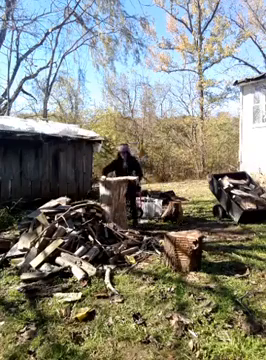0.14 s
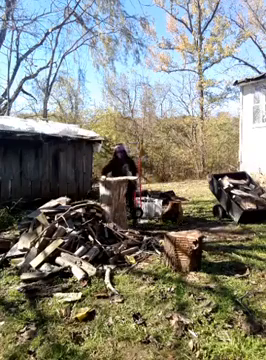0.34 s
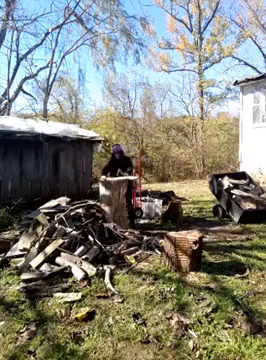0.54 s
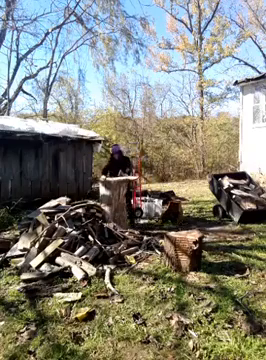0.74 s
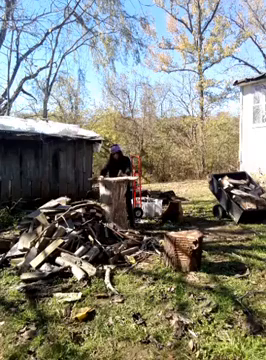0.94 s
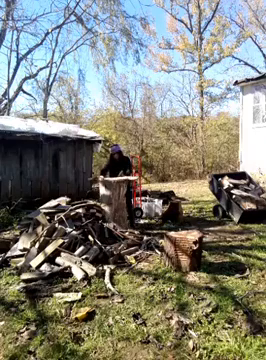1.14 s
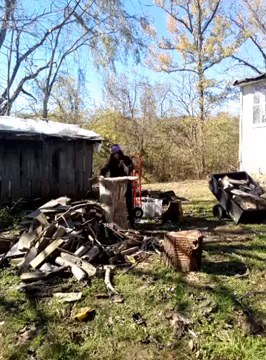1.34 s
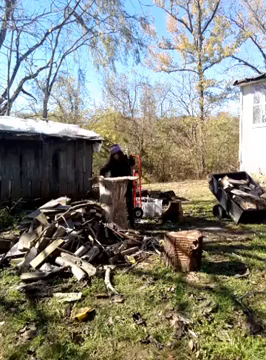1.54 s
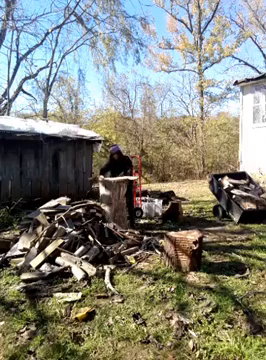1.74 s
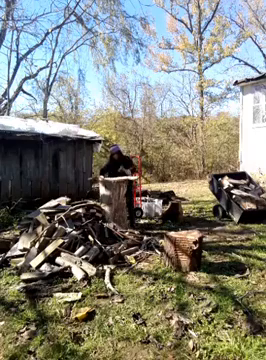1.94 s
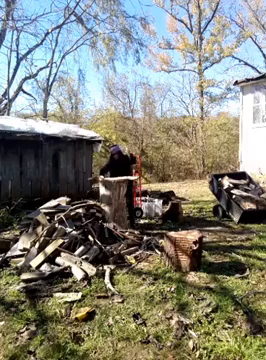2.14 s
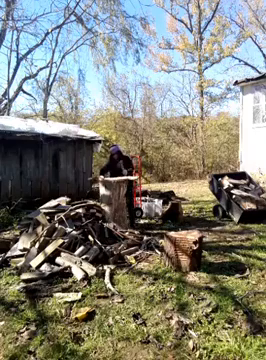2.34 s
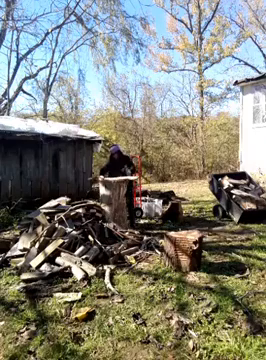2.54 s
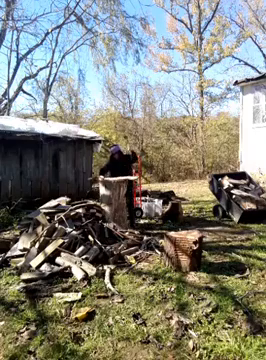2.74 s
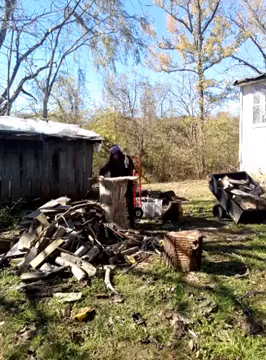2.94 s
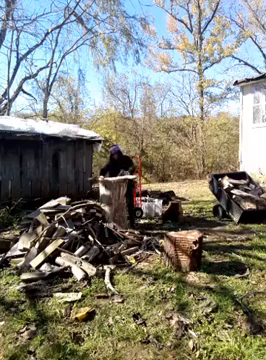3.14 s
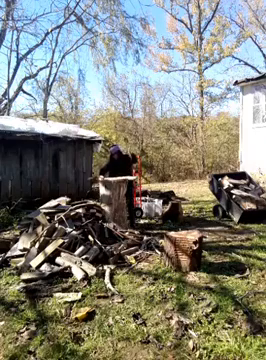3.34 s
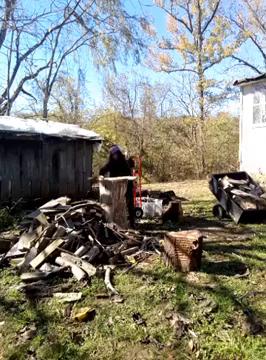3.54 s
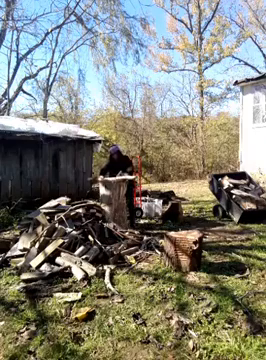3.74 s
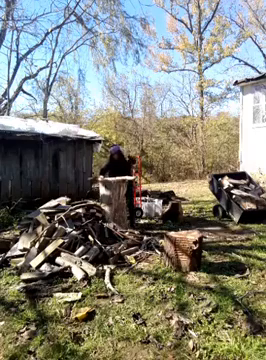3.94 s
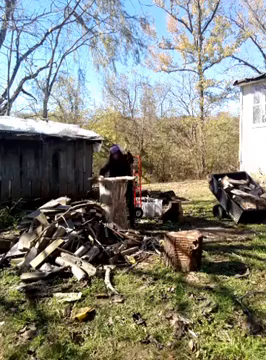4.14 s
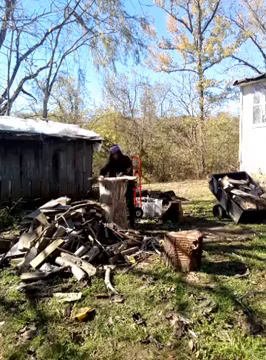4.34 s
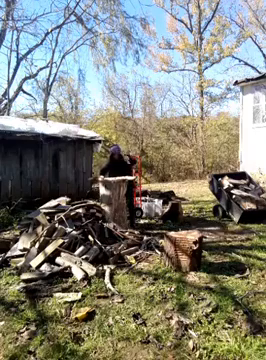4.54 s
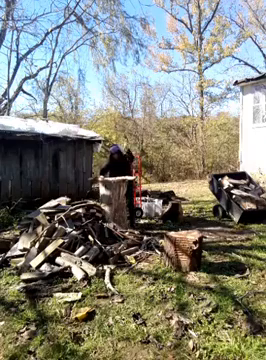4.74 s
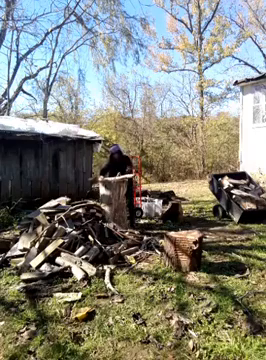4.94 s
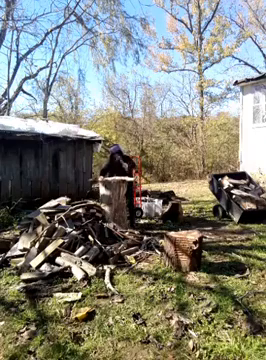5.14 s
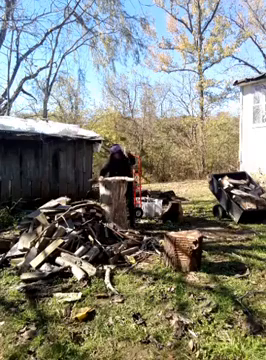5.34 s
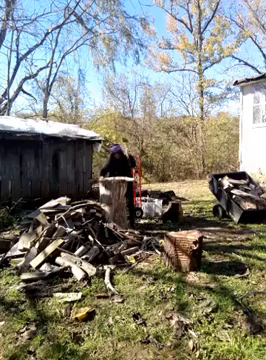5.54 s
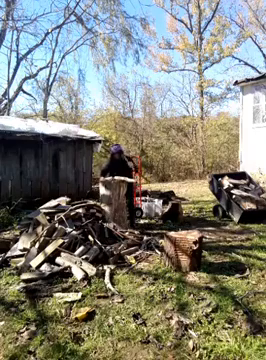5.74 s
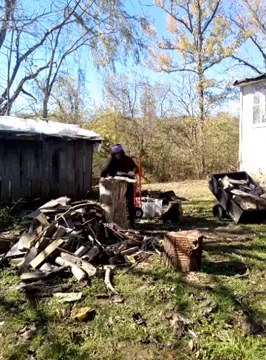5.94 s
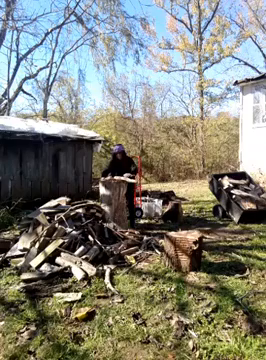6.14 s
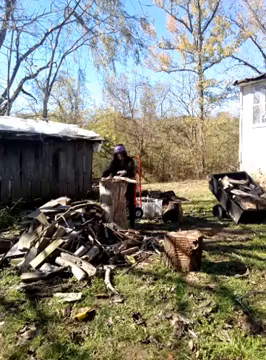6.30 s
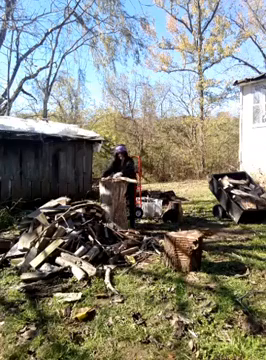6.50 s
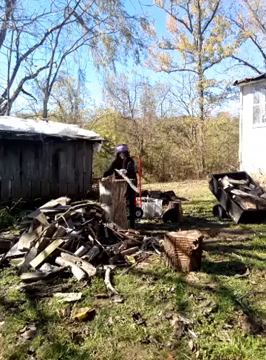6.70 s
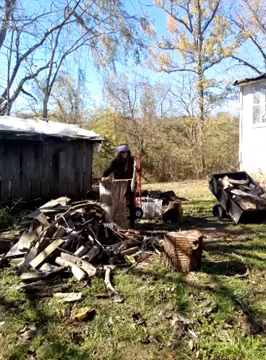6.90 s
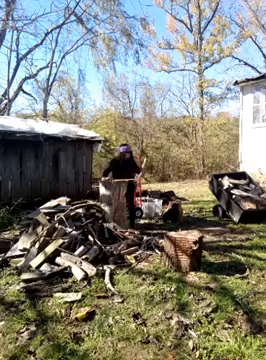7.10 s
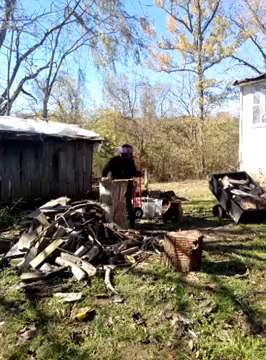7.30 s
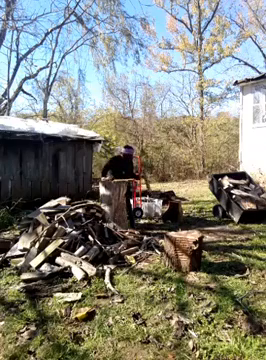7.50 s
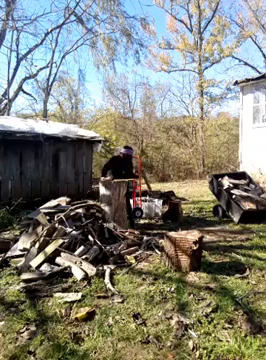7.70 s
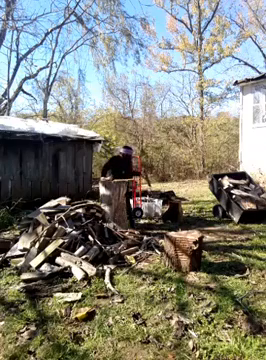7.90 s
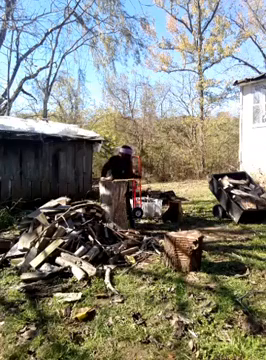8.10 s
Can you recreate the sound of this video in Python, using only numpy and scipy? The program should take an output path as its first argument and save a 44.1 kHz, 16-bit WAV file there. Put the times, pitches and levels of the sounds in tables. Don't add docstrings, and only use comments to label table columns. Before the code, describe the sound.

Six sharp hatchet chops on a wooden block in an open yard, evenly spaced, then a cut stick drops and bounces over faint wind.

```python
import sys
import numpy as np
from scipy import signal
from scipy.fft import rfft, irfft
from scipy.io import wavfile
from scipy.ndimage import uniform_filter1d

SR = 44100
rng = np.random.default_rng(int(sys.argv[2]) if len(sys.argv) > 2 else 0)


def volts_from_decibels(level):
    exponent = np.asarray(level, float) / 20
    return 10 ** exponent


def log_audio(samples):
    frames = np.atleast_2d(samples).T
    limited = np.clip(frames, -1, 1)
    pcm = np.round(limited * 32767).astype(np.int16)
    wavfile.write(sys.argv[1], SR, pcm)


N = 364266

# pitch_hz, level_db (per Hz)
AIR_COLOUR = [(25, 0.5), (60, 8.5), (95, 12), (200, 4), (500, -2.5), (1200, -13.5), (3000, -16.5),
              (5000, -16), (9000, -26.5)]
# delay_s, level_db, spread_s
WALL_ECHOES = [
    (0.011, -22.5, .003),
    (.019, -12.5, .005),
    (.026, -14, .008),
    (0.043, -21, 0.016),
    (.118, -39, 0.015),
]
# pitch_hz, near_db (leaves and walls), far_db (trees)
SCATTER = [(74, -26, -47), (200, -23, -41), (430, -34, -48), (750, -30.5, -44), (1250, -27, -45),
           (2500, -26, -42), (6500, -23.5, -36.5), (11800, -29, -46)]
# start_s, level_db (peak), fade_s (for 20 dB), dull_db
BRUSHES = [(0.005, -68, .07, 0), (0.094, -70, .015, -18), (0.2, -67, .22, 14), (0.66, -82, .16, 24),
           (0.742, -61, .045, 21), (1.16, -78, .07, 0), (1.83, -82, .05, -5), (4.982, -72, .012, -10),
           (5.288, -64, .025, -10), (5.398, -70, .015, -10), (5.45, -72, .012, -10), (6.41, -60, .12, 5),
           (6.73, -72, .07, 5), (6.83, -72, .08, 10), (7.59, -73, .12, 8)]
# start_s, level_db, hardness_db (per mode group upward), lowest_mode_db
STICK_KNOCKS = [
    (0.19, -84, 11, 2),
    (0.7362, -68, 4, 4),
    (2.4179, -76, 3, 18),
    (6.3244, -46.5, -6, 5),
    (6.4053, -51, 1, -9),
    (6.5224, -61, -2, 7),
    (6.6084, -80, 1, 21),
    (6.7311, -75, -3, -3),
    (7.7544, -82, 2, 1),
    (8.0794, -80, 3, -4),
]
# pitch_hz, t60_s
STICK_MODE_GROUPS = [
    [(2260, .04)],
    [(2900, .03)],
    [(3350, 0.026), (3950, .015)],
    [(4900, 0.027), (5750, 0.0081)],
    [(1030, 0.036)],
]
STICK_EVEN_DB = [0, 2, -1, -8]
# start_s, level_db (peak), deep_db, block_knock_db
BLOW_THUDS = [
    (1.925, -35, -20, 16),
    (2.572, -38, -20, 17),
    (3.209, -33, -14, 8),
    (3.833, -38, -4, 1),
    (4.465, -32, -28, 5),
    (5.094, -45, -17, 19),
]
# start_s, level_db (peak), deep_db, block_knock_db
DROP_THUDS = [
    (0.219, -59, -13, -10),
    (0.659, -54, -40, 0),
    (0.742, -48, -10, -6),
    (5.26, -63, -4.5, -8),
    (6.323, -52, -35, 0),
    (6.403, -49.5, -26, 6),
    (6.523, -53, -33, 4),
    (6.608, -59, -12, -5),
]
# start_s, lower_mode_db, upper_mode_db, sizzle_db, extra_sizzle_to_walls_db
STEEL_HITS = [
    (0.0189, -66, -70, -76, 29),
    (0.093, -76, -64, -85, 21),
    (0.1196, -72, -77, -81, 15),
    (1.9252, -31.5, -38.5, -37, 21),
    (2.5755, -31, -31.5, -36.5, 19),
    (3.2113, -38, -40.5, -38.5, 21),
    (3.558, -82.5, -66.5, -69, 17),
    (3.8345, -63, -46.5, -42, 18),
    (4.4647, -42.5, -32, -33, 23.5),
    (5.0936, -70, -52.5, -42, 20),
]
# pitch_hz, t60_s
STEEL_RINGS = [(6700, .03), (9800, .03)]
# start_s, level_db (peak), ring_hz, overtone_db, crack_db
LIGHT_TAPS = [(0.629, -60, 740, -24, -31), (0.657, -36.5, 256, -38, -40), (0.738, -39, 653, -19, -22),
              (2.416, -49, 745, -9, -11), (6.326, -28, 890, -28, -30), (6.405, -32.5, 695, -7.5, -8),
              (6.523, -40, 673, -5, -9.5), (6.609, -48, 703, -20, -15), (6.729, -68, 762, -11, -10),
              (6.839, -59, 736, -14, -28), (7.754, -66, 773, -16, -5), (8.079, -66, 792, -13.5, -4),
              (3.1795, -57, 800, -6, -14), (3.058, -66, 760, 0, -10)]
# start_s, level_db (peak), ring_hz, overtone_db, crack_db
BLOWS = [
    (1.9248, -14, 600, -19.5, -8),
    (2.5735, -9, 625, -8.5, -7.5),
    (3.21, -9.5, 777, -14.5, -12),
    (3.8345, -15, 746, -18, -9.5),
    (4.464, -12, 780, -14.5, -1),
    (5.096, -12.5, 773, -13.5, -12),
]
# pitch_hz, width_hz, level_db
HOLDER_RINGS = [(762, 130, 13), (1393, 90, 6), (2095, 80, 0), (2875, 120, -2), (3225, 170, 4.5),
                (4020, 290, -1.5)]
# pitch_hz, level_db
MIC_COLOUR = [(30, -9), (90, -0.5), (300, 0.5), (2000, 7.5), (5000, 3), (8000, 3.5), (8900, -1),
              (10000, 2.5), (14000, 5)]

LEAD_S = 0.0012
TOP_HZ = 14250


def colour(x, points):
    hz, db = np.transpose(points)
    grid = np.log(np.maximum(np.fft.rfftfreq(4096, 1 / SR), 1))
    cepstrum = irfft(np.log(volts_from_decibels(np.interp(grid, np.log(hz), db))))
    cepstrum[1:2048] *= 2
    cepstrum[2049:] = 0
    return signal.fftconvolve(x, irfft(np.exp(rfft(cepstrum))))[:len(x)]


def ring(x, hz, t60):
    pole = np.exp(2j * np.pi * hz / SR - np.log(1000) / (t60 * SR))
    return signal.lfilter([1], [1, -pole], x).imag


def band(x, lo_hz, hi_hz):
    return signal.sosfilt(signal.butter(2, [lo_hz, hi_hz], "bandpass", fs=SR, output="sos"), x)


def peak(x, db):
    return x * volts_from_decibels(db) / np.max(np.abs(x))


def level(x, db):
    return x * volts_from_decibels(db) / np.sqrt(np.mean(x ** 2))


def walk(rate):
    hold = int(SR / rate)
    steps = np.repeat(rng.standard_normal(N // hold + 1), hold)
    return uniform_filter1d(uniform_filter1d(steps, hold), hold)[:N]


def add(out, x, s):
    i = int(s * SR)
    out[i:i + len(x)] += x[:len(out) - i]


def force(bite_s, chance, steep, let_go_s, scatter_db):
    t = np.arange(len(chance[0])) / SR
    shape = np.where(t < bite_s, (t / bite_s) ** steep, np.exp(-(t - bite_s) / let_go_s))
    return shape * chance[0] * volts_from_decibels(scatter_db * np.abs(chance[1]))


def gain():
    t = np.arange(N) / SR
    sink_db, sink_s = 1.15, .55
    hold_s, recover_s, kept = .9, .35, .25
    sunk_db = sum(sink_db * np.clip((t - row[0]) / sink_s, 0, 1) for row in BLOWS)
    wait = np.maximum(t - BLOWS[-1][0] - hold_s, 0)
    return volts_from_decibels(-sunk_db * (kept + (1 - kept) * np.exp(-wait / recover_s)))


def air():
    noise = colour(rng.standard_normal(N), AIR_COLOUR)
    bass = band(noise, 17, 340)
    return level(volts_from_decibels(1.2 * walk(1.5)) * (noise - bass) + volts_from_decibels(1.5 * walk(3)) * bass, -71.5)


def yard():
    t = np.arange(int(1.2 * SR)) / SR
    out = np.zeros(len(t))
    for delay_s, db, spread_s in WALL_ECHOES:
        smear = (t > delay_s) * np.exp(-np.abs(t - delay_s) / spread_s)
        echo = smear * rng.standard_normal(len(t)) * rng.exponential(size=len(t))
        out += volts_from_decibels(db) * echo / np.sqrt(np.sum(echo ** 2))
    swell = 1 - np.exp(-(t / .018) ** 3)
    tail = 0
    near_t60, open_t60 = .2, 1.5
    points_hz, *levels_db = np.transpose(SCATTER)
    for hz in np.geomspace(74, 11800, 10):
        near_db, far_db = (np.interp(np.log(hz), np.log(points_hz), db) for db in levels_db)
        far_t60 = open_t60 / (1 + 250 / hz + hz / 4500)
        near = volts_from_decibels(near_db - 60 * np.maximum(t - .032, 0) / near_t60)
        far = volts_from_decibels(far_db - 60 * t / far_t60)
        noise = band(rng.standard_normal(len(t)), hz / 1.33, hz * 1.33) / np.sqrt(hz / 40)
        tail = tail + (near + far) * noise
    lumps = volts_from_decibels(2.5 * walk(160)[:len(t)] - 1)
    return out + swell * tail * lumps


def rustle():
    t = np.arange(N) / SR
    lumps_db = 4.4 * np.repeat(rng.exponential(size=N // 64 + 1), 64)[:N] * .5
    grains = rng.standard_normal(N) * volts_from_decibels(lumps_db)
    bright = level(band(grains, 2000, 10200), -6.4)
    dull = level(band(rng.standard_normal(N), 100, 630), -13.5)
    out = np.zeros(N)
    for s, db, fade_s, dull_db in BRUSHES:
        away = np.where(t > s, t - s, (s - t) / .12) / fade_s
        out += volts_from_decibels(db - 20 * away) * (bright + volts_from_decibels(dull_db) * dull)
    return out


def stick():
    out = np.zeros(N)
    chances = rng.standard_normal((len(STICK_KNOCKS), 2, 4096))
    for (s, db, hard_db, low_db), chance in zip(STICK_KNOCKS, chances):
        snaps = force(0.0023, chance, 3.0, 0.00077, 4.0)
        upper_db = np.array(STICK_EVEN_DB) + hard_db * np.arange(len(STICK_EVEN_DB))
        for group, group_db in zip(STICK_MODE_GROUPS, [*upper_db, low_db]):
            tones = sum(ring(snaps, hz, t60) for hz, t60 in group)
            add(out, peak(band(tones, 940, 7600), db + group_db - 5), s - LEAD_S)
    return np.array([out, volts_from_decibels(3.5) * out])


def thuds(rows, direct_db):
    out = np.zeros((2, N))
    push = np.append(np.hanning(40), np.zeros(8000))
    for (s, db, deep_db, block_db), chance in zip(rows, rng.standard_normal((len(rows), 3))):
        thump = sum(ring(push, hz * (1 + 0.058 * k), 0.028) for hz, k in zip((160, 230, 340), chance))
        deep = peak(ring(push, 85, 0.073), db + deep_db - 2.5)
        thump = peak(band(thump, 93, 550), db - 2.5) + deep
        block = ring(push, 490, 0.025) + ring(push, 530, 0.051)
        block = peak(band(band(block, 380, 700), 380, 700), db + block_db - 3)
        add(out[0], volts_from_decibels(direct_db) * thump + block, s)
        add(out[1], thump + volts_from_decibels(-14) * block, s)
    return out


def steel():
    out = np.zeros((2, N))
    knock = np.exp(-np.arange(4096) / .7)
    chances = rng.standard_normal((len(STEEL_HITS), 2, 4096))
    for (s, *modes_db, sizzle_db, around_db), chance in zip(STEEL_HITS, chances):
        snaps = force(0.0035, chance, 6.3, .0012, 4.0)
        modes = sum(peak(ring(snaps, hz, t60), db) for (hz, t60), db in zip(STEEL_RINGS, modes_db))
        scrape = force(.003, chance[::-1], 2.5, 0.015, 2.0)
        add(out[0], modes + peak(band(scrape, 5500, 13000), sizzle_db), s - LEAD_S)
        spread = peak(band(knock, 4700, 12500), sizzle_db + around_db - 2.5)
        add(out[1], volts_from_decibels(-17) * modes + spread, s + 0.006)
    return out


def contact(snaps, push, row, t60):
    _, db, hz, over_db, crack_db = row
    body = ring(push, hz, t60) + 0.44 * ring(push, 0.82 * hz, t60) + .8 * ring(push, 1.25 * hz, t60)
    body = peak(band(band(body, .45 * hz, 1300), .45 * hz, 1300), -11)
    overtone = peak(band(ring(push + snaps, 1415, max(t60, .009)), 1200, 1600), over_db - 8)
    crack = peak(band(band(snaps, 2050, 4900), 1150, 7000), -2)
    block_rings = peak(ring(snaps, 3205, .04), -23) + peak(ring(snaps, 2110, .03), -28)
    return volts_from_decibels(db) * (body + overtone + volts_from_decibels(crack_db) * (crack + block_rings))


def wood(rows, bite_s, t60, let_go_s):
    out = np.zeros((2, N))
    knock = np.exp(-np.arange(4096) / 1.0)
    for row, chance in zip(rows, rng.standard_normal((len(rows), 3, 4096))):
        start_s = row[0] - LEAD_S
        snaps = force(bite_s, chance, 6.6, let_go_s, 7.0)
        push = force(bite_s, chance[1:], 0.6, 0.0022, 3.1)
        add(out[0], contact(snaps, push, row, t60), start_s)
        add(out[1], contact(knock, knock, row, 0.3 * t60), start_s + bite_s)
    return out


def scene():
    chops = wood(BLOWS, bite_s=.004, t60=0.021, let_go_s=0.0031)
    taps = wood(LIGHT_TAPS, bite_s=.0016, t60=.025, let_go_s=0.0022)
    ground = volts_from_decibels(-1.5) * thuds(BLOW_THUDS, 0) + thuds(DROP_THUDS, 5)
    direct, around = chops + taps + stick() + steel() + ground
    add(direct, volts_from_decibels(-7) * direct.copy(), .00142)
    echoes = signal.fftconvolve(volts_from_decibels(4) * around, yard())[:N]
    return (volts_from_decibels(-1.5) * direct + echoes + rustle() + gain() * air())[None]


def roll_off(x):
    return signal.sosfilt(signal.butter(12, 15600, fs=SR, output="sos"), x)


def record(dry):
    x = dry[0]
    for hz, width_hz, db in HOLDER_RINGS:
        b, a = signal.iirpeak(hz, hz / width_hz, SR)
        x = x + volts_from_decibels(db) * signal.lfilter(b, a, dry[0])
    x = signal.lfilter(*signal.iirnotch(8900, 8900 / 550, SR), x)
    hiss = gain() * level(band(rng.standard_normal(N), 5000, 18000), -79.7)
    x = colour(x + hiss, MIC_COLOUR)
    below = signal.sosfilt(signal.ellip(8, .2, 60, TOP_HZ, fs=SR, output="sos"), x)
    above = signal.sosfilt(signal.butter(8, TOP_HZ, "high", fs=SR, output="sos"), x)
    mix = below + volts_from_decibels(-33.5) * above
    return roll_off(mix[None])


dry = scene()
out = record(dry)
log_audio(out)
```